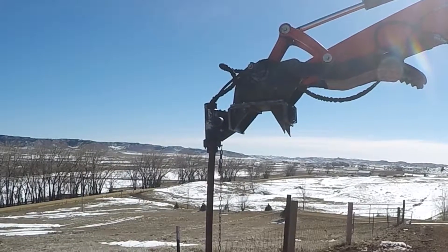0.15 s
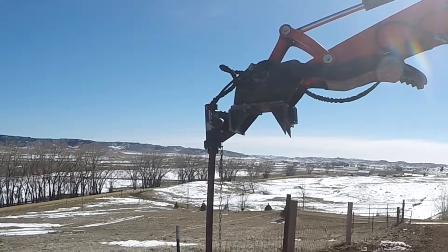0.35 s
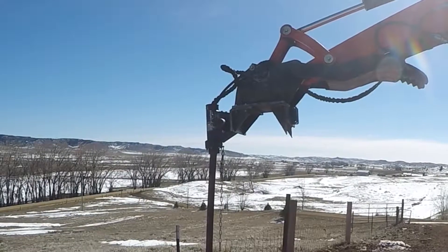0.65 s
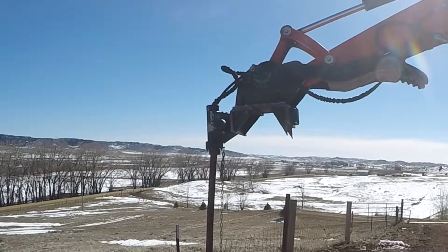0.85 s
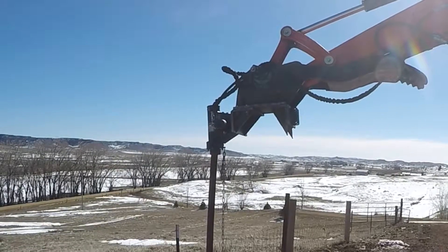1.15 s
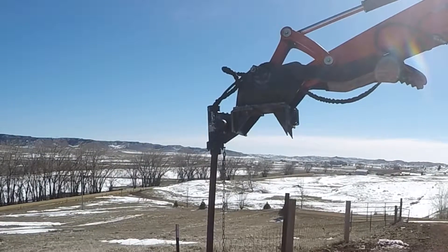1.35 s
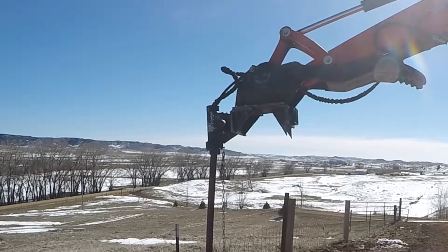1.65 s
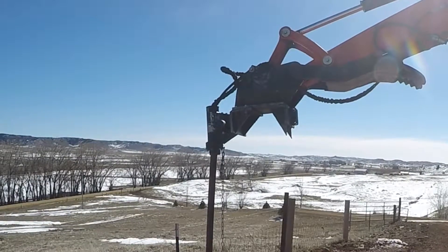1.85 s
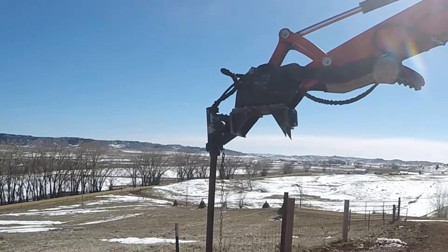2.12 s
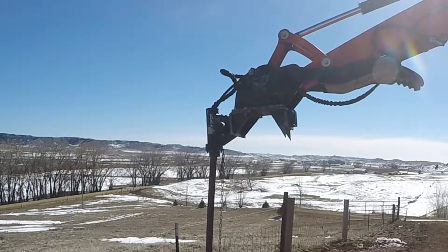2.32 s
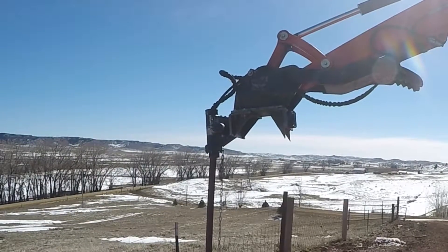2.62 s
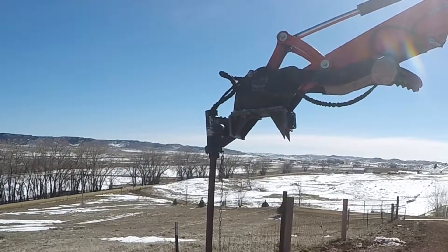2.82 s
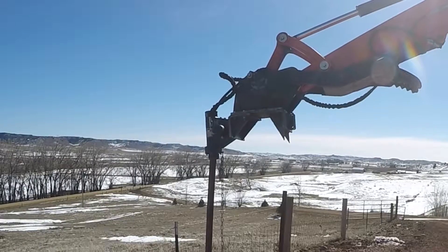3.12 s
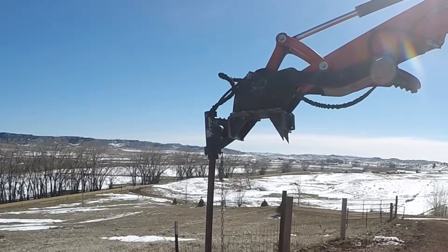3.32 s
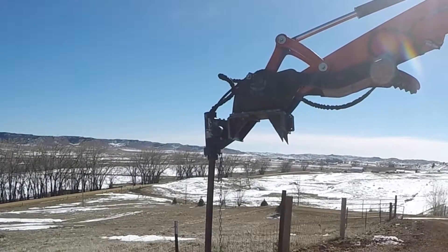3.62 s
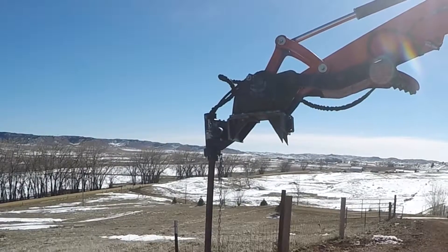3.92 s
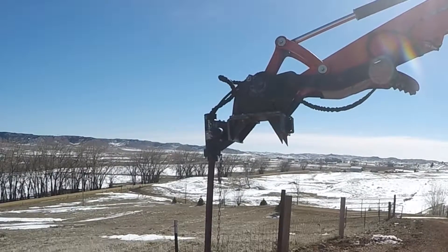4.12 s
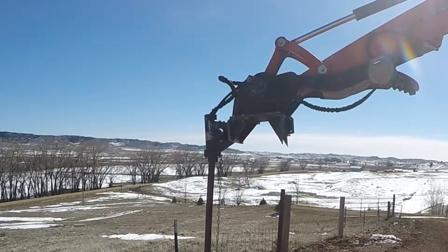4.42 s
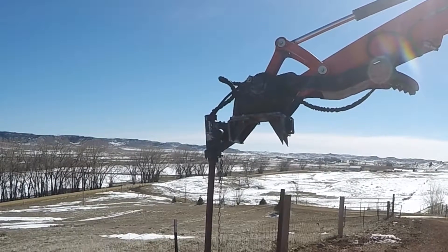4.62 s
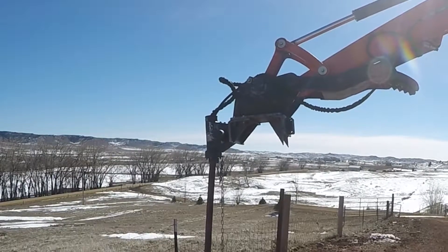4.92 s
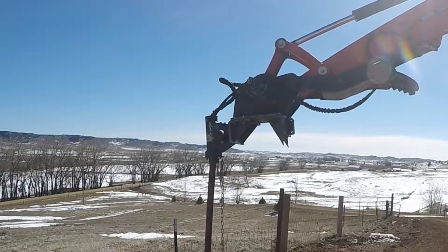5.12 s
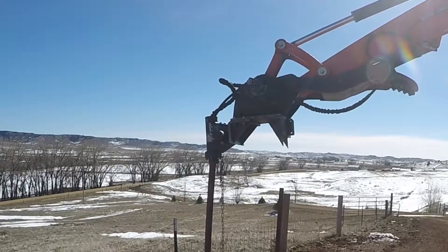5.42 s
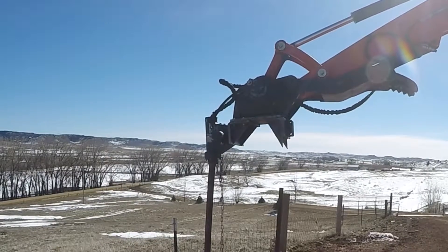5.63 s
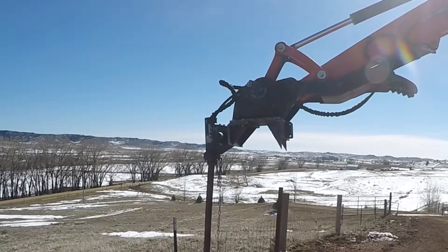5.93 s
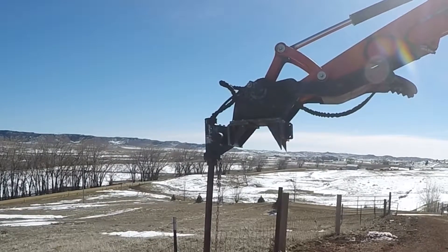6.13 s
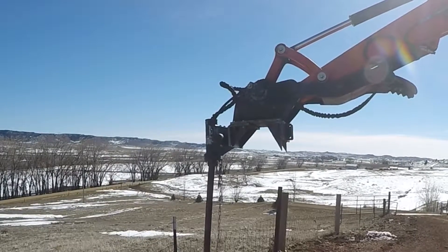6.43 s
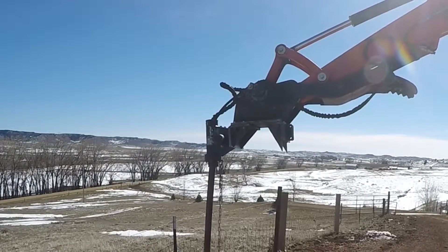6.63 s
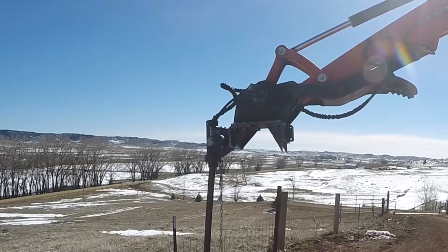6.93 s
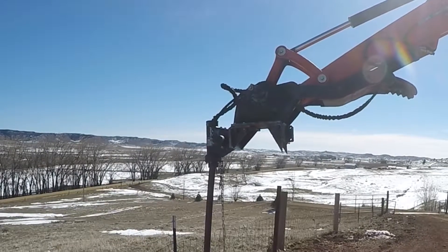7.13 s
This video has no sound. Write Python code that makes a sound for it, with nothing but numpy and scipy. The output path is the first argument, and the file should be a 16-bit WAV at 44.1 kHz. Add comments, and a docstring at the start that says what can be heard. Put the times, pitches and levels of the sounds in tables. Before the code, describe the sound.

Outdoors, loose metallic knocks and three sharp steel blows give way to fast, hard hammering at seven strikes a second, diesel engine droning beneath.

```python
"""Open field, mono microphone, no echo: a diesel excavator drones throughout, a post still rings from an earlier blow.
First a loose driver's cap knocks on the steel post around three single blows of the hydraulic hammer.
From about 2.1 s the hammer runs at about seven blows a second, bouncing twice after each; single blows barely bounce.
Blows are bursts of filtered noise through the driver, decaying sines in cap and post and a wash of fluttering noise.
The diesel is a few wavering sines over coloured noise."""
import sys
import numpy as np
from scipy import signal
from scipy.fft import rfft, irfft
from scipy.io import wavfile

SR = 44100
rng = np.random.default_rng(int(sys.argv[2]) if len(sys.argv) > 2 else 0)


def inscribe(sig):
    """Save sig as 16-bit PCM at rate SR to the path in sys.argv[1].

    A 1-D sig is mono; a 2-D sig holds one channel per row.
    Samples are clipped to [-1, 1] before scaling.
    """
    pcm = np.round(np.clip(np.atleast_2d(sig).T, -1, 1) * 32767)
    wavfile.write(sys.argv[1], SR, pcm.astype(np.int16))


N = 320166

# All levels in dB are relative and add up, unless said otherwise.
FIRING_HZ = 70.2  # mean firing rate of the diesel
# sines of the diesel: [multiple of the firing rate, level/dB]
ENGINE_ORDERS = [(1, 0), (4 / 3, -17), (2.2, -23.5)]
# level of the firing tone, rms re full scale: [t/s, level/dB]
DRONE_LEVEL = [(0, -47), (1.56, -45), (2.97, -48.5), (3.6, -44.5), (4.04, -50), (4.4, -44), (4.95, -44),
               (5.34, -50.5), (5.82, -42.5), (6.25, -49.5), (6.6, -45.5), (7.26, -46)]
# faint hum of the machine, rms re full scale: [mean f/Hz, level/dB]
HUM = [(161.5, -75), (420, -71), (457.6, -75), (527.6, -77.5), (705, -78.5)]
# spectrum of exhaust, fan and open air: [f/Hz, level/dB]
RUMBLE_SPECTRUM = [(20, 1.5), (45, -1.5), (95, 0.5), (130, -5), (200, -14.5), (300, -19.5), (700, -27.5),
                   (1400, -24), (1900, -23), (3500, -25), (8000, -38), (16000, -43)]

# spectrum of the post's many faint, long-lived modes: [f/Hz, level/dB]
SHIMMER_SPECTRUM = [(900, -13.5), (1450, -30), (1650, -1), (2250, -6.5), (2570, 1), (3100, -8.5), (3550, 5),
                    (4500, -13), (5000, -18.5), (5800, 0), (6400, -11.5), (7100, -7.5), (8800, -20.5),
                    (15000, -28.5)]
ROUND_TRIP_HZ = 41.4  # how often a shock runs down the post and back

# loose knocks of the cap on the post: [t/s, level/dB]
KNOCKS = [(.063, -19), (.156, -24.5), (.488, -17.5), (.591, -24), (1.642, -42.5), (1.737, -17.5),
          (1.813, -25.5), (2.022, -13.5)]
# short modes of the loose cap: [f/Hz, level/dB, t60/s]
CAP_MODES = [(1097, -26, 0.1), (1383, -31, .1), (1550, -25.5, 0.15), (1643, -22.5, 0.14),
             (1930, -23.5, 0.082), (3850, -18.5, 0.074), (4180, -17.5, 0.051)]
# bending modes of the post: [f/Hz, level/dB, t60/s]
POST_MODES = [(625, -46, 0.22), (1610, -52.5, 0.64), (1670, -35, 0.3), (2554, -47, 1.3), (2750, -36, 0.31),
              (2864, -34, 0.25), (3210, -35.5, 0.27), (3442, -31, 0.76), (3492, -18, 0.27),
              (3492, -24, 0.41), (3475, -26.5, 0.23), (3520, -24.5, 0.1), (3670, -25.5, 0.15),
              (3875, -48, 0.41), (4030, -45, .5), (4600, -34.5, 0.12), (4660, -34.5, 0.093),
              (9440, -38.5, 0.22)]
# level of the post's ring under the blows: [t/s, level/dB]
POST_RING = [(.29, 0.5), (.73, -2.5), (2.43, -2.5), (3, -1), (3.6, -3.5), (4.3, -3.5), (5.3, 0),
             (5.96, -2.5), (7.1, -1.5)]

# band edges of the driver's five registers (thud, housing, cap, upper cap, crack): [f/Hz]
REGISTER_EDGES = [140, 900, 3300, 4350, 4900, 17000]
# per register: [clatter level/dB, clatter t60/s, tail level/dB, tail t60/s, rebound level/dB, knock level/dB]
REGISTERS = [(-7, 0.038, -16.5, 0.38, 2, 8.5), (-9, 0.083, -28.5, 0.27, 2.5, 3.5),
             (-12, 0.084, -43.5, 0.32, 0, -6.5), (-8, 0.06, -48, 0.3, -19.5, -13.5),
             (-10.5, 0.12, -35.5, 0.47, -4.5, -4)]
# strength of any blow, per register: [level/dB]
BLOW_LEVEL = [0.56, 0.87, 1.0, 0, 0.77]
# added for a single blow, per register: [level/dB]
SINGLE_EXTRA = [-1, 1, 3.8, -1, 1]
# the cap's upper clang as the post sinks: [t/s, level/dB]
UPPER_CLANG = [(.29, -1), (1.92, -1.5), (2.43, -7.5), (3.2, 5), (3.84, 8), (3.98, -0.5), (4.83, 4.5),
               (5.25, -2), (5.96, 0.5), (7.25, 2.5)]
UPPER_CAP = 3  # index of its register
# broad colour of the steel: [f/Hz, level/dB]
STEEL_SPECTRUM = [(140, -20.5), (270, -21.5), (400, -28), (620, -22.5), (900, -16.5), (1300, -9.5),
                  (3200, -16), (3500, 1.5), (4350, -2), (4700, -4.5), (4950, -18.5), (7200, -15.5),
                  (9000, -25.5), (15500, -36)]
# resonances and gaps on top of it: [f/Hz, width/Hz, boost/dB]
RESONANCES = [(189.3, 30, 5), (260.4, 17, 3), (640, 55, 3), (866, 74, -8.5), (1335, 270, 0.5),
              (1488, 34, -11), (1654, 89, 3.5), (1964, 140, 4.5), (2170, 95, -4), (2537, 99, 8),
              (2554, 50, 5), (2867, 24, 10.5), (3117, 27, 11.5), (4220, 84, -1), (4345, 180, -7.5),
              (4614, 210, 4.5), (5335, 154, 6), (5885, 370, 7.5), (6430, 400, -6.5), (6730, 260, 6),
              (7530, 70, 6), (10520, 570, 7.5)]

# the hammer's first, single blows: [t/s]
SINGLE_BLOWS = [.2905, .7281, 1.9153]
# changes of pace of the running hammer, with even blows in between: [t/s]
PACE_CHANGES = [2.1413, 2.2914, 4.4051, 4.8317, 6.0986, 6.2415, 6.5346, 6.824, 7.248]
STROKE_S = .141  # nominal time between blows, adjusted to fit a whole number in each stretch
# strength of the bounce while the hammer runs: [t/s, level/dB]
REBOUND_LEVEL = [(2.14, -12), (2.29, -7), (2.6, -9.5), (4.5, -10), (6.3, -12), (6.7, -9.5)]
# time in the air before the hammer falls back: [t/s, delay/s]
BOUNCE_TIME = [(1.92, .03), (2.14, 0.043), (2.29, 0.04), (3, 0.043), (4.4, .038), (6.4, 0.043), (7.1, .039)]


def from_db(db):
    """Decibels to gain."""
    return 10 ** (np.asarray(db) / 20)


def at(t, table):
    """Read a two-column table at t, with straight lines between its rows."""
    return np.interp(t, *np.transpose(table))


def rms_one(x):
    """Scale to unit power."""
    return x / np.sqrt(np.mean(x ** 2) + 1e-20)


def colour(x, spectrum, peaks=()):
    """Minimum-phase filter of unit power gain for white noise: a broad spectrum with bell-shaped peaks."""
    size = 2 ** 14
    hz = np.maximum(np.arange(size // 2 + 1) * SR / size, 1)
    points = np.array(spectrum)
    db = np.interp(np.log(hz), np.log(points[:, 0]), points[:, 1])
    for centre, width, boost in peaks:
        db = db + boost / (1 + (2 * (hz - centre) / width) ** 2)
    # folding the cepstrum makes the response causal
    cepstrum = irfft(np.log(from_db(db)))[:size // 2]
    cepstrum[1:] *= 2
    response = irfft(np.exp(rfft(cepstrum, size)))
    return signal.fftconvolve(x, response / np.linalg.norm(response))[:len(x)]


def band(x, low, high):
    """Steep band-pass."""
    sos = signal.butter(4, [low, min(high, .45 * SR)], "band", fs=SR, output="sos")
    return signal.sosfilt(sos, x)


def fade(t, t60):
    """Exponential decay by 60 dB in t60 seconds."""
    return from_db(-60 * t / t60)


def add(track, s, sound):
    """Mix a sound in from time s."""
    start = int(np.clip(round(s * SR), 0, N))
    track[start:start + len(sound)] += sound[:N - start]


def clicks(times, sizes):
    """One impulse at each time."""
    out = np.zeros(N)
    for s, size in zip(times, sizes):
        add(out, s, np.array([size]))
    return out


def ring(x, hz, t60):
    """A two-pole resonator: a unit click sets a decaying sine of initial height 1 ringing."""
    r, w = fade(1 / SR, t60), 2 * np.pi * hz / SR
    return signal.lfilter([0, np.sin(w)], [1, -2 * r * np.cos(w), r * r], x + 1e-18)


def ring_modes(modes, times, db, spread_db, contact_s):
    """Every contact strikes each mode at its own random strength, up to contact_s late."""
    out = np.zeros(N)
    for hz, mode_db, t60 in modes:
        late = contact_s * rng.random(len(times))
        uneven_db = rng.normal(0, spread_db, len(times))
        out += ring(clicks(times + late, from_db(db + mode_db + uneven_db)), hz, t60)
    return out


def drift(rate_hz):
    """Slow random wander: normal values of spread 1, joined by straight lines."""
    knots = np.arange(N) / SR * rate_hz
    return np.interp(knots, np.arange(1000), rng.standard_normal(1000))


def diesel(rumble_db=-50.5, waver=.004):
    """A slightly wavering firing tone with weak overtones and hum over exhaust and fan noise."""
    # the integral of relative speed, times 2 pi: phase per hertz
    turn = 2 * np.pi * np.cumsum(1 + waver * drift(rate_hz=6)) / SR
    drone = np.zeros(N)
    for order, order_db in ENGINE_ORDERS:
        phase = rng.uniform(0, 2 * np.pi)
        drone += from_db(order_db) * np.sin(order * FIRING_HZ * turn + phase)
    drone *= from_db(at(np.arange(N) / SR, DRONE_LEVEL))
    hum = sum(from_db(hum_db) * np.sin(hz * turn) for hz, hum_db in HUM)
    rumble = from_db(rumble_db) * colour(rng.standard_normal(N), RUMBLE_SPECTRUM)
    return np.sqrt(2) * (drone + hum) + rumble  # sqrt(2): from rms to peak of a sine


def shimmer(blow_s, level_db=-41.5, t60=1.42, earlier_blow_s=0.12, flutter=1.0, flutter_above_hz=5000):
    """A faint wash of modes outlasts each blow, its top fluttering as the shock runs up and down the post."""
    t = np.arange(2 * SR) / SR
    strikes = clicks(blow_s, np.ones(len(blow_s)))
    wash = colour(rng.standard_normal(N), SHIMMER_SPECTRUM)
    out = np.zeros(N)
    for side, depth in (("low", 0), ("high", np.clip(flutter, 0, 1))):
        pulse = 1 - depth * np.cos(2 * np.pi * ROUND_TRIP_HZ * t)
        # power decay, with the mean power of the flutter divided out
        decay = (fade(t, t60) * pulse) ** 2 / (1 + depth ** 2 / 2)
        power = np.maximum(signal.fftconvolve(strikes, decay)[:N], 0)
        # the post still rings from a blow before the start
        add(power, 0, decay[int(earlier_blow_s * SR):])
        sos = signal.butter(3, flutter_above_hz, side, fs=SR, output="sos")
        out += np.sqrt(power) * signal.sosfilt(sos, wash)
    return from_db(level_db) * out


def cap(blows, knock_db=3.0, spread_db=3.5, contact_s=.002):
    """The cap's short modes clank when it knocks on the post or the hammer first falls back on it."""
    blow_s, _, delay, rebound_db = blows
    knock_s, loose_db = np.transpose(KNOCKS)
    times, db = np.r_[blow_s + delay, knock_s], np.r_[rebound_db, loose_db + knock_db]
    return ring_modes(CAP_MODES, times, db, spread_db, contact_s)


def post(blow_s, spread_db=3.0, knock_share_db=-15.0, contact_s=.003):
    """The post's bending modes ring after each blow and, more weakly, each knock."""
    knock_s, loose_db = np.transpose(KNOCKS)
    times = np.r_[blow_s, knock_s]
    db = np.r_[at(blow_s, POST_RING), loose_db + knock_share_db]
    return ring_modes(POST_MODES, times, db, spread_db, contact_s)


def contacts(blows, register, second_bounce_db=-13.0, bounce_ratio=1.9, spread_db=0.47, clang_spread_db=1.5):
    """Blows, two bounces after each, and knocks as one register feels them: (t/s, level/dB)."""
    blow_s, single, delay, rebound_db = blows
    blow_db = BLOW_LEVEL[register] + single * SINGLE_EXTRA[register]
    blow_db = blow_db + spread_db * rng.standard_normal(len(blow_s))
    if register == UPPER_CAP:
        blow_db = blow_db + at(blow_s, UPPER_CLANG) + clang_spread_db * rng.standard_normal(len(blow_s))
    register_rebound_db, register_knock_db = REGISTERS[register][-2:]
    first_db = rebound_db + register_rebound_db
    knock_s, loose_db = np.transpose(KNOCKS)
    times = np.r_[blow_s, blow_s + delay, blow_s + bounce_ratio * delay, knock_s]
    db = np.r_[blow_db, first_db, first_db + second_bounce_db, loose_db + register_knock_db]
    return zip(times, db)


def driver(blows, alike=0.28, rise_s=0.0005, hold_s=0.0022, chatter_db=1.5, chatter_s=0.001535):
    """Each contact bursts into dense modes, partly the same every time, that chatter and die fast."""
    t = np.arange(SR // 3) / SR
    alike = np.clip(alike, 0, 1)  # share of the power that repeats
    knots = t / chatter_s
    attack = 1 - np.exp(-t / rise_s)
    out = np.zeros(N)
    for k, (clatter_db, clatter_t60, tail_db, tail_t60, _, _) in enumerate(REGISTERS):
        clatter = from_db(clatter_db) * fade(np.maximum(t - hold_s, 0), clatter_t60)
        tail = from_db(tail_db) * fade(t, tail_t60)
        # the repeatable part excites all modes equally, at random phases
        same = rms_one(irfft(np.exp(2j * np.pi * rng.random(len(t) // 2 + 1)), len(t)))
        track = np.zeros(N)
        for s, db in contacts(blows, k):
            own, slow = rng.standard_normal((2, len(t)))
            chatter = from_db(chatter_db * np.interp(knots, np.arange(len(t)), slow))
            grain = np.sqrt(alike) * same + np.sqrt(1 - alike) * own
            add(track, s, from_db(db) * grain * attack * np.hypot(clatter * chatter, tail))
        out += band(track, REGISTER_EDGES[k], REGISTER_EDGES[k + 1])
    return colour(out, STEEL_SPECTRUM, RESONANCES)


def hammer(bounce_spread_s=.0012, single_rebound_db=-29, rebound_spread_db=1.0):
    """Each blow's time, whether it is single, and the delay and level of its bounce onto the cap."""
    stretches = []
    for start, end in zip(PACE_CHANGES, PACE_CHANGES[1:]):
        count = round((end - start) / STROKE_S)
        stretches.append(np.linspace(start, end, count, endpoint=False))
    blow_s = np.concatenate([SINGLE_BLOWS, *stretches, PACE_CHANGES[-1:]])
    single = np.arange(len(blow_s)) < len(SINGLE_BLOWS)
    late, hard = rng.standard_normal((len(blow_s), 2)).T
    delay = at(blow_s, BOUNCE_TIME) + bounce_spread_s * late
    rebound_db = np.where(single, single_rebound_db, at(blow_s, REBOUND_LEVEL))
    return blow_s, single, delay, rebound_db + rebound_spread_db * hard


def scene():
    """The hammer's blows sound through driver, cap and post, over the diesel."""
    blows = hammer()
    blow_s = blows[0]
    steel = driver(blows) + cap(blows) + post(blow_s) + shimmer(blow_s)
    return (steel + diesel())[None]


def record(dry, ceiling=1.6, cutoff_hz=15600):
    """The microphone signal has its highest peaks rounded and its top cut steeply."""
    rounded = ceiling * np.tanh(dry / ceiling)
    return signal.sosfilt(signal.ellip(10, .1, 80, cutoff_hz, fs=SR, output="sos"), rounded)


dry = scene()
out = record(dry)
inscribe(out)
```